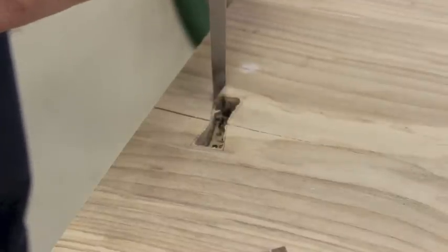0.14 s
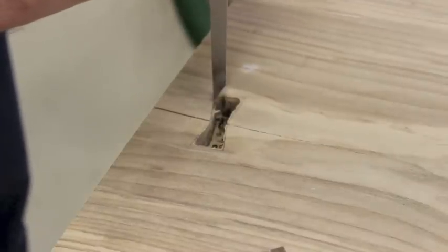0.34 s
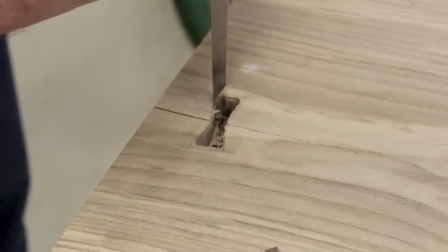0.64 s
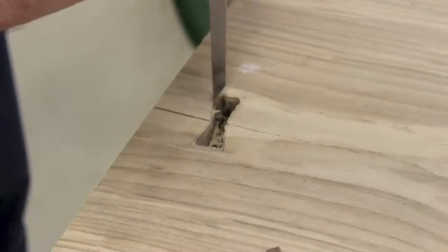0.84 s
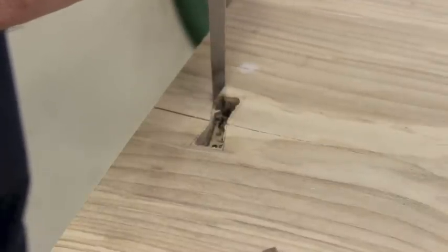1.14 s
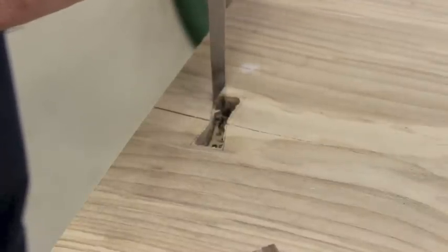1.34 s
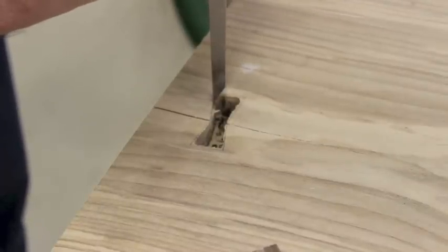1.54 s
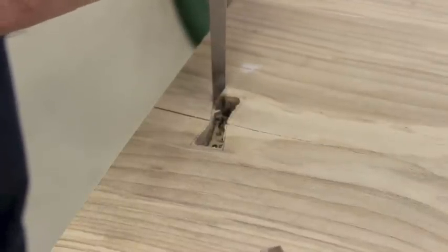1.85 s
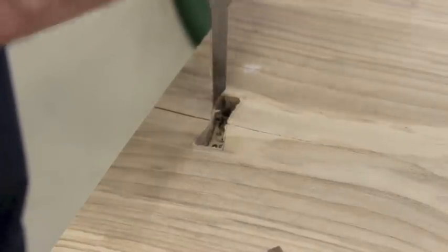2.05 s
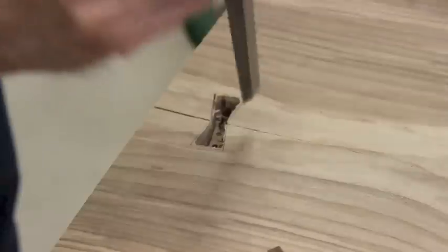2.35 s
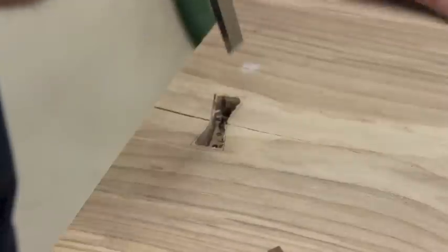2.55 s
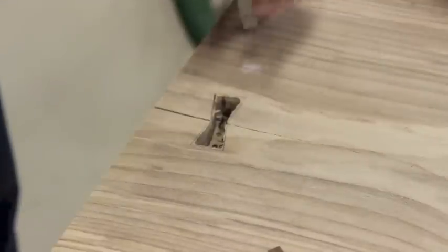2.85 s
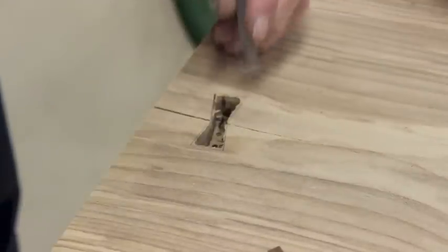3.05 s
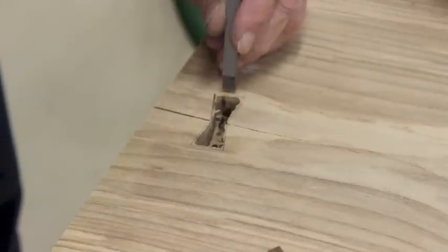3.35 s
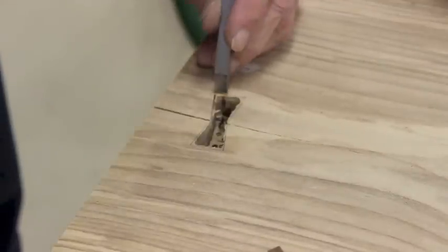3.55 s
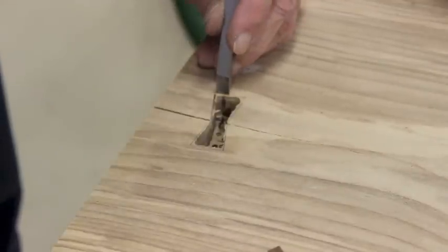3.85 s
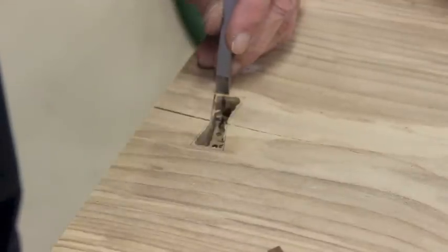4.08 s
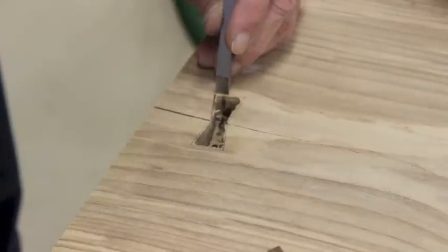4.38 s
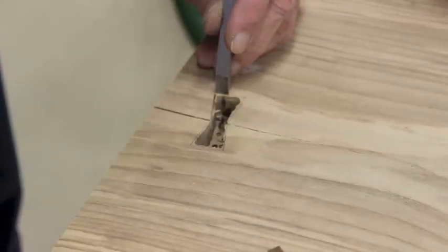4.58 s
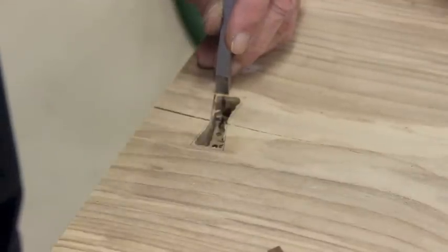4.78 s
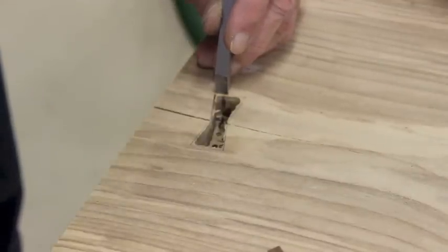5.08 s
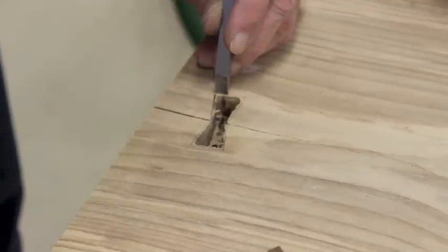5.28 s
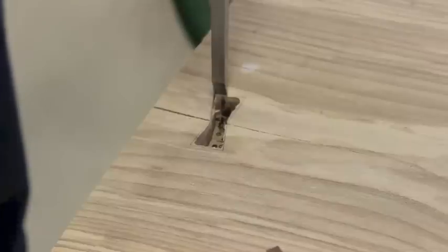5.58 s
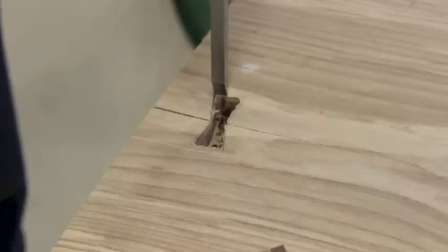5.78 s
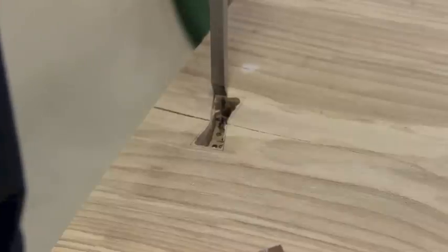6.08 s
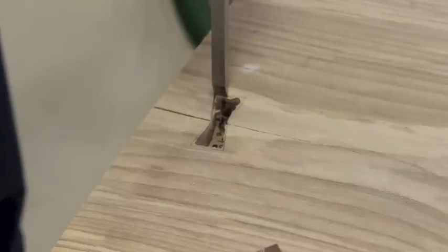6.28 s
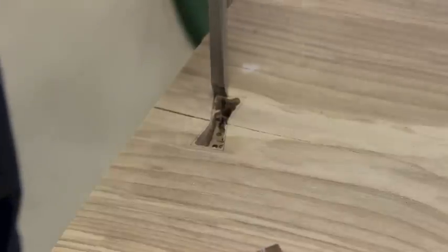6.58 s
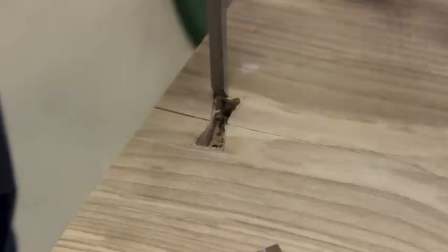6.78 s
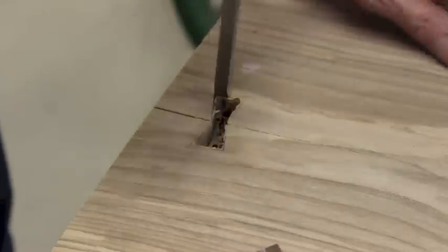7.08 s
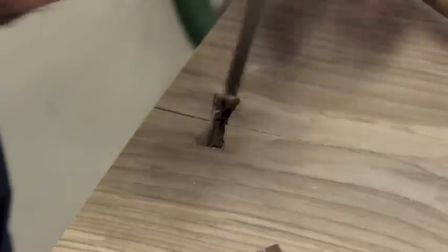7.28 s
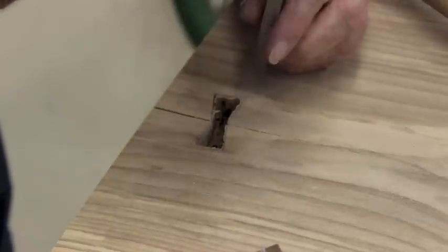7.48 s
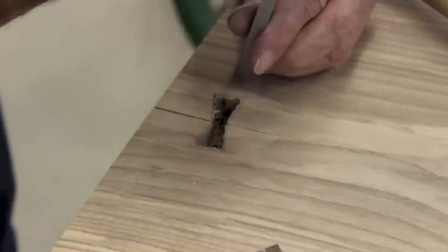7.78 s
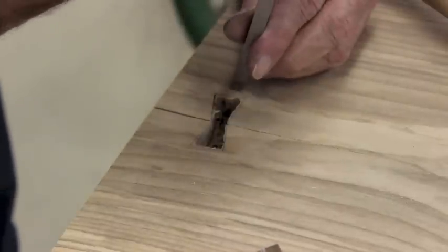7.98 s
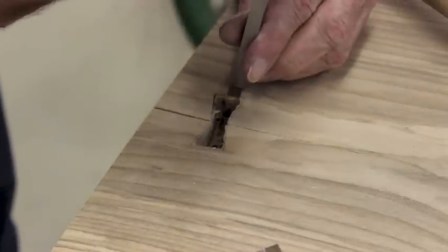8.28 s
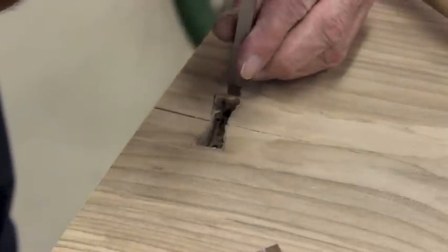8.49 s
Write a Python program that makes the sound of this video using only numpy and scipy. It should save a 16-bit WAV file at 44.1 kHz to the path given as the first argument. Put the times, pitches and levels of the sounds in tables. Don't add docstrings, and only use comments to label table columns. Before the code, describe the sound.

Close to a workbench, a mallet hits a chisel once, then five more times at a steady pace, cracking into a wooden plank. The blade rubs and a knock frees it. After a faint touch and a long humming pause come three brighter blows, more rubbing, another knock, two light taps and a faint last scrape. Blows overload the microphone and the room rings.

```python
import sys
import numpy as np
from scipy import signal
from scipy.fft import rfft, irfft, next_fast_len
from scipy.io import wavfile
from scipy.ndimage import map_coordinates

SR = 44100
rng = np.random.default_rng(int(sys.argv[2]) if len(sys.argv) > 2 else 0)


def store_pcm(level_fs):
    pcm = np.round(np.clip(level_fs, -1, 1) * 32767).astype(np.int16)
    wavfile.write(sys.argv[1], SR, np.atleast_2d(pcm).T)


def how_loud(loudness_db):
    steps = np.asarray(loudness_db, float) / 20
    return 10 ** steps


N = 380569


def at_hz(points, hz):
    table_hz, value = np.transpose(points)
    return np.interp(np.log(hz), np.log(table_hz), value)


def rms_one(x):
    return x / np.sqrt(np.mean(x ** 2) + 1e-20)


def drift(rate_hz):
    knots = rng.standard_normal(400)
    return map_coordinates(knots, [np.arange(N) / SR * min(rate_hz, 40)], order=3)


def resonance(x, hz, width_hz):
    r = np.exp(-np.pi * width_hz / SR)
    top = [(1 - r * r) / 2, 0, (r * r - 1) / 2]
    return signal.lfilter(top, [1, -2 * r * np.cos(2 * np.pi * hz / SR), r * r], x)


def convolve(x, tail):
    size = next_fast_len(len(x) + len(tail))
    return irfft(rfft(x, size) * rfft(tail, size), size)[:len(x)]


def add(track, start_s, sound):
    at = round(start_s * SR)
    track[at:at + len(sound)] += sound[:N - at]


# bass_db, room_db, gain_sink_db
KINDS = [
    (-5, 4, -12),
    (1.5, 1.25, -14.5),
    (-2.9, -1.7, -15),
    (0.5, -1.57, -10.5),
    (5.5, -0.5, -14.5),
]
# start_s, peak_db at the microphone, treble_db, steel_db, wood_hz (rises as the blade bites deeper)
OPENING_BLOW = [
    (0.352, 8.1, -6.5, -24, 1030),
]
FIRST_RUN = [
    (0.652, 4.5, -2, -20.5, 1080),
    (0.964, 5.5, -4.5, -26.5, 1150),
    (1.262, 5.1, 0, -28, 1380),
    (1.567, 3.3, 0, -26.5, 1460),
    (1.862, 1.54, 0.5, -22, 1460),
]
FIRST_KNOCK = [
    (2.5, 5.998, -0.76, -45, 1370),
]
SECOND_RUN = [
    (5.657, 9.1, 1.5, -16, 963),
    (5.94, 5.7, 0.86, -7.5, 906),
    (6.214, 0.44, 1.3, -17, 1310),
]
SECOND_KNOCK = [
    (6.92, 6.985, -1.8, -38.5, 1400),
]
# pitch_hz, width_hz, level_db
PLANK_DEEP = [(351, 33, -6.5), (576, 110, -8.5), (1039, 160, -4), (1431, 31, -1.5), (1847, 59, -8),
              (2152, 280, -14), (2198, 12, -12), (2360, 8.7, -20.5), (2950, 25, -36), (3260, 8.3, -15.5),
              (3163, 42, -41), (3768, 97, -10), (4140, 13, -30), (3680, 15, -51), (4124, 70, -32),
              (4540, 23, -38), (4924, 140, -23.5), (6460, 28, -36), (6700, 30, -44.5), (7840, 17, -42.5)]
PLANK_SHALLOW = [(328, 66, -4), (585.5, 13, -1.5), (822, 47, 4), (1101, 59, -3), (1416, 12, 3),
                 (1488, 67, -26.5), (1736, 98, -3), (1926, 15, -16), (2142, 67, -16), (2030, 29, -3),
                 (2480, 7.3, -17.5), (2860, 99, -1.5), (3130, 69, -42), (3535, 54, -9.5), (3664, 72, -9.5),
                 (4730, 72, -25.5), (5570, 130, -26), (5280, 120, -36), (6700, 47, -42), (7270, 360, -19.5)]
HANDLE_FIRST = [(562, 51, -11), (759, 13, -9.5), (825, 96, -8), (1034, 12, -3.5), (1436, 57, 1.5),
                (1652, 7.5, -12.5), (2000, 11, 0.5), (2025, 16, -2), (2455, 76, -9.5), (2850, 140, -21),
                (3745, 99, -8.5), (4210, 32, -27.5), (5250, 62.6, -36), (8570, 83, -27.5)]
HANDLE_SECOND = [(636, 100, -17), (1010, 31, -2), (1397, 16, 8.5), (1683, 40, 3.5), (1883, 6.7, -20.5),
                 (2320, 41, -2), (2310, 15, -22), (2700, 52, -30), (3634, 150, -13), (4775, 360, -25),
                 (5500, 49, -34.5), (6400, 190, -49.5), (7640, 510, -49.5), (9300, 85, -46)]
BENCH = [(208, 27, -11.5), (275, 75, -10.5)]
# pitch_hz, level_db per Hz
THUMP_OPENING = [(60, -56.5), (110, -26), (200, 1), (400, 3.5), (600, -10), (1050, -2.5), (1500, -9),
                 (2200, -8), (3000, -25.5), (4200, -33), (6500, -39.5), (9000, -58.5), (13000, -80.5)]
THUMP_DEEP = [(60, -76), (110, -24), (217, -5), (400, 1), (625, -6), (1000, -5), (1500, -5.5),
              (2200, -14.5), (2600, -21.5), (3700, -25.5), (4400, -36), (6500, -44), (9000, -49),
              (13000, -61.5)]
THUMP_FIRST = [(60, -59), (110, -23.5), (340, -4.5), (750, -4), (1100, 0.5), (1400, -2), (1900, -5),
               (2770, -9), (4000, -25), (5000, -29), (6500, -46.5), (9000, -49), (13000, -63)]
THUMP_SHALLOW = [(60, -66), (110, -13.5), (260, -2), (450, -4.5), (800, 1), (1300, -1.5), (2170, -9.5),
                 (2500, -19), (3300, -26), (4300, -35.5), (6500, -42.5), (9000, -41.5), (13000, -46.5)]
THUMP_SECOND = [(60, -53.5), (110, -16), (433, -8), (780, -5.5), (1130, -6.5), (1440, -4), (1900, -9.5),
                (2400, -17), (3200, -39.5), (4500, -45.5), (6000, -72.5), (13000, -94)]
RING_TO_ROOM_DB, RING_TOP_HZ = -40.5, 1776


def mallet():
    near, far = np.zeros(N), np.zeros(N)
    gain_db = recorder_gain_db()
    dull = signal.butter(4, RING_TOP_HZ, fs=SR, output="sos")
    sources = [(OPENING_BLOW, PLANK_DEEP + BENCH, THUMP_OPENING),
               (FIRST_RUN, PLANK_DEEP + BENCH, THUMP_DEEP),
               (FIRST_KNOCK, HANDLE_FIRST, THUMP_FIRST),
               (SECOND_RUN, PLANK_SHALLOW + BENCH, THUMP_SHALLOW),
               (SECOND_KNOCK, HANDLE_SECOND, THUMP_SECOND)]
    for (rows, modes, spectrum), (bass_db, room_db, _) in zip(sources, KINDS):
        for start_s, peak_db, treble_db, steel_db, wood_hz in rows:
            before_db = gain_db[round(start_s * SR)]
            after_db = gain_db[round((start_s + 0.08) * SR)]
            direct = blow(modes, bass_db, treble_db)
            add(near, start_s, how_loud(peak_db + 4.5 - before_db) * direct)
            add(far, start_s, how_loud(room_db + RING_TO_ROOM_DB - after_db) * signal.sosfilt(dull, direct))
            pulse = thump(spectrum, bass_db, treble_db, steel_db, wood_hz)
            add(far, start_s - 0.004, how_loud(room_db - after_db) * pulse)
    return near, far


def blow(modes, bass_db, treble_db, rise_s=0.00085, crack_db=-11, crack_s=0.00096):
    body = rings(modes, bass_db, treble_db, spread_db=3.0, damping=1.7)
    t = np.arange(len(body)) / SR
    swell = 1 - np.exp(-(t / rise_s) ** 2)
    body = body * swell
    crack = resonance(rng.standard_normal(len(t)), 3000, 1700) * np.exp(-t / crack_s) * swell
    return body / np.abs(body).max() + how_loud(crack_db + treble_db) * crack / np.abs(crack).max()


def rings(modes, bass_db, treble_db, spread_db, damping):
    t = np.arange(SR // 8) / SR
    hz, width_hz, level_db = np.transpose(modes)[:, :, None]
    width_hz = np.maximum(width_hz, 20)
    chance, phase = rng.standard_normal(hz.shape), rng.random(hz.shape)
    colour_db = at_hz([(350, bass_db), (1000, 0.0026), (3500, treble_db)], hz)
    height = how_loud(level_db + colour_db + spread_db * chance) * width_hz
    decay = np.exp(-np.pi * damping * width_hz * t)
    return np.sum(height * decay * np.sin(2 * np.pi * (hz * t + phase)), axis=0)


# pitch_hz, width_hz, level_db
STEEL = [(2850, 230, -24), (3673, 130, -32), (5300, 110, -33), (7800, 350, -46), (10700, 500, -47),
         (12300, 500, -50)]
WOOD_DB, WOOD_WIDTH = 4, 0.11


def thump(spectrum, bass_db, treble_db, steel_db, wood_hz):
    hz = np.maximum(np.arange(513) * SR / 1024, 1)
    colour_db = at_hz([(350, bass_db), (1000, 0.034), (3500, treble_db)], hz)
    wood_lift_db = WOOD_DB * np.exp(-(np.log(hz / wood_hz) / WOOD_WIDTH) ** 2)
    gain = how_loud(at_hz(spectrum, hz) + colour_db + wood_lift_db)
    steel = how_loud(steel_db) * rings(STEEL, 0, 0, spread_db=-1.5, damping=0.93) * 30 * np.pi / SR
    steel = steel * (1 - np.exp(-(np.arange(len(steel)) / 80) ** 2))
    out = np.concatenate([np.zeros(256), steel])
    window = np.hanning(1024)[np.minimum(np.arange(1024) * 2, 512)]
    out[:1024] += np.roll(irfft(gain), 256) * window
    return out


# start_s, hold_s, level_db
RUB = [
    (2.3, 0.088, -52.5),
    (6.66, 0.023, -56),
    (6.805, 0.078, -56.5),
    (7.498, 0.4, -62.5),
]
# pitch_hz, width_hz, level_db
BLADE = [(2180, 210, 0.5), (3170, 400, -3.5), (4370, 490, -2.5), (6800, 780, -11.5)]
RUB_RISE_DB_S, RUB_FALL_DB_S = 400, 252.5


def rubbing():
    slips = (rng.random(N) < 2500 / SR) * rng.standard_normal(N) + 1e-18
    blade = rms_one(sum(how_loud(level_db) * rms_one(resonance(slips, hz, width_hz))
                        for hz, width_hz, level_db in BLADE))
    t = np.arange(N) / SR
    strokes = np.zeros(N)
    for start_s, hold_s, level_db in RUB:
        rise_db = RUB_RISE_DB_S * np.maximum(start_s - t, 0)
        fall_db = RUB_FALL_DB_S * np.maximum(t - start_s - hold_s, 0)
        strokes += how_loud(level_db - rise_db - fall_db)
    return blade * strokes * how_loud(2.0 * drift(25))


# start_s, peak_db, pitch_hz, t60_s
THUDS = [
    (3.388, -29, 385, 0.068),
    (3.395, -39, 250, 0.26),
    (3.389, -45, 1150, 0.05),
    (6.989, -17.5, 900, 0.032),
    (7.094, -20.5, 700, 0.045),
]
TICKS = [
    (6.9905, -43, 3570, 0.02),
    (7.0938, -47.5, 3980, 0.018),
]
TIP = [
    (1.838, -45, 3600, .012),
    (7.517, -41, 4380, .035),
    (7.517, -45, 2300, .08),
]


def touches(rows, lift_db, rise_s, spacing):
    out, t = np.zeros(N), np.arange(SR // 8) / SR
    gain_db = recorder_gain_db()
    for start_s, peak_db, hz, t60_s in rows:
        cluster = sum(np.sin(2 * np.pi * hz * spacing ** k * t) * (-0.73) ** abs(k) for k in range(-2, 3))
        swell = 1 - np.exp(-(t / rise_s) ** 2)
        level_db = peak_db + lift_db - gain_db[round(start_s * SR)] - 60 * t / t60_s
        add(out, start_s, how_loud(level_db) * cluster * swell)
    return out


# pitch_hz, t60_s
ROOM_T60 = [(100, .4), (260, 0.47), (700, 0.51), (1800, 0.51), (4800, 0.52), (8000, .33), (12000, 0.19)]
# pitch_hz, level_db
ROOM_COLOUR = [(100, 0), (2000, 1), (6000, 3), (12000, 4)]


def workshop(x, build_s=0.0052, early_db=3, early_s=0.011):
    t, tail = np.arange(SR) / SR, 0
    edges = 70 * 2 ** np.arange(0, 8.2, 0.5)
    white = rng.standard_normal((2, SR))
    for k, (low, high) in enumerate(zip(edges, edges[1:])):
        hz = np.sqrt(low * high)
        band = signal.sosfilt(signal.butter(2, [low, high], "band", fs=SR, output="sos"), white[k % 2])
        tail = tail + band * how_loud(at_hz(ROOM_COLOUR, hz) - 60 * t / at_hz(ROOM_T60, hz))
    build = 1 - np.exp(-(t / build_s) ** 2)
    return convolve(x, tail * build * how_loud(early_db * np.exp(-t / early_s)))


# pitch_hz, level_db per Hz
FAN = [(15, -36.5), (25, -11), (44, -8), (86, -6), (194, -8), (306, -2), (360, -3), (400, -18.5),
       (458, -1.5), (524, -10), (600, -8.5), (923, -9), (1670, -18.5), (7750, -30.5), (15600, -33)]
# pitch_hz, level_db
MOTOR = [(360.7, -55.0), (452.2, -62.5), (597.5, -62.0), (775.2, -66.5), (904.4, -67.5), (457.0, -61),
         (428, -60.5)]
FAN_DB = -44


def fan():
    hz = np.maximum(np.arange(N // 2 + 1) * SR / N, 1)
    air = rms_one(irfft(rfft(rng.standard_normal(N)) * how_loud(at_hz(FAN, hz)), N))
    t = np.arange(N) / SR
    tones = np.zeros(N)
    for tone_hz, level_db in MOTOR:
        level = how_loud(level_db + 4.5 + 1.5 * drift(11))
        tones += level * np.sin(2 * np.pi * tone_hz * t + 0.7 * drift(2))
    return how_loud(FAN_DB - 3.5 + 0.34 * drift(5.9)) * air + tones


SINK_CARRY = 0.51
ATTACK_S, HOLD_S, RELEASE_DB_S = 0.01, 0.1, 33


def recorder_gain_db():
    t, gain_db = np.arange(SR) / SR, np.zeros(N)
    groups = [OPENING_BLOW, FIRST_RUN, FIRST_KNOCK, SECOND_RUN, SECOND_KNOCK]
    for rows, (_, _, sink_db) in zip(groups, KINDS):
        for start_s, *_ in rows:
            at = round((start_s + 0.0049) * SR)
            sunk_db = sink_db + SINK_CARRY * gain_db[at - 1]
            climb_db = RELEASE_DB_S * np.maximum(t - HOLD_S, 0)
            gain_db[at:at + SR] = np.minimum(sunk_db + climb_db, 0)
    r = np.exp(-1 / (ATTACK_S * SR))
    return signal.lfilter([1 - r], [1, -r], gain_db)


def scene():
    near, far = mallet()
    thuds = touches(THUDS, lift_db=3.0, rise_s=0.00051, spacing=1.3)
    ticks = touches(TICKS, lift_db=-2, rise_s=0.0004, spacing=1.11)
    ticks += touches(TIP, lift_db=-8, rise_s=0.001, spacing=1.02)
    room = workshop(how_loud(-1.5) * far + how_loud(-36.5) * thuds + how_loud(-37) * ticks)
    return (near + thuds + ticks + rubbing() + room + fan())[None]


def low_pass(x):
    return signal.sosfilt(signal.butter(12, 16850, fs=SR, output="sos"), x)


def record(dry):
    top_cut = signal.ellip(8, 0.5, 45, 15800, fs=SR, output="sos")
    x = signal.sosfilt(top_cut, dry)
    mix = np.clip(x * how_loud(recorder_gain_db()), -1, 1)
    return low_pass(mix)


dry = scene()
out = record(dry)
store_pcm(out)
```